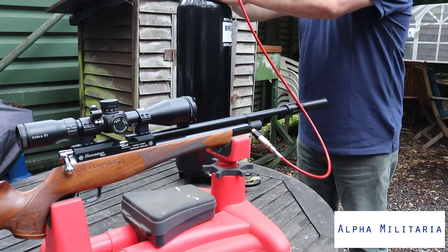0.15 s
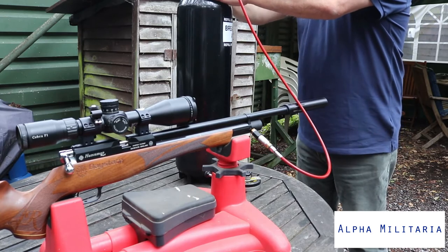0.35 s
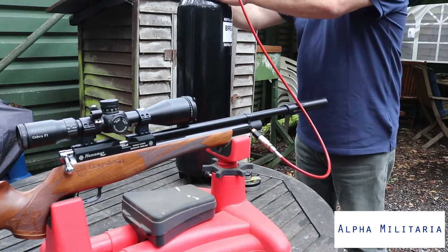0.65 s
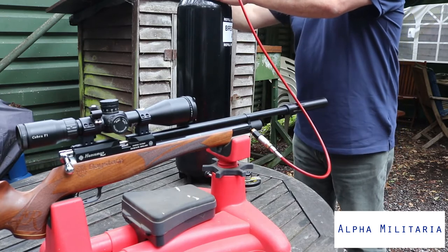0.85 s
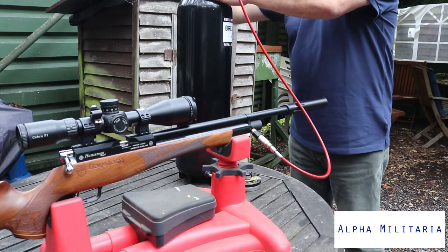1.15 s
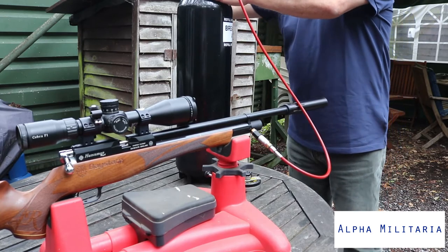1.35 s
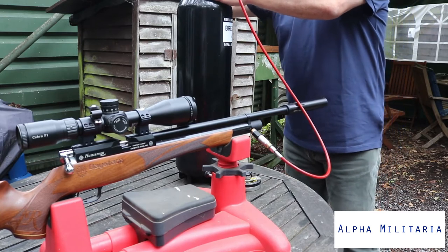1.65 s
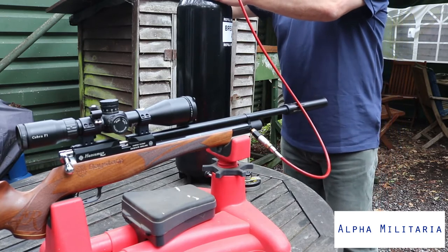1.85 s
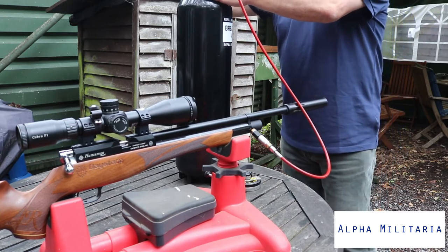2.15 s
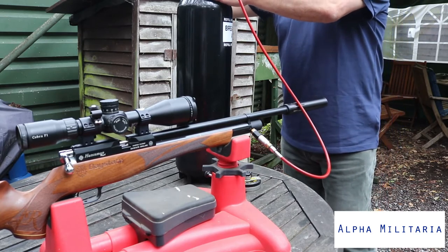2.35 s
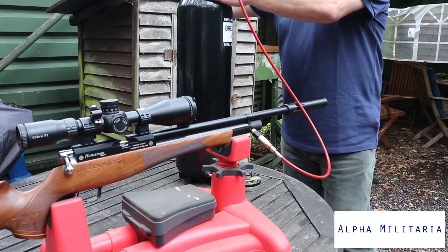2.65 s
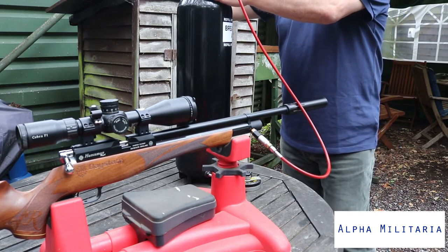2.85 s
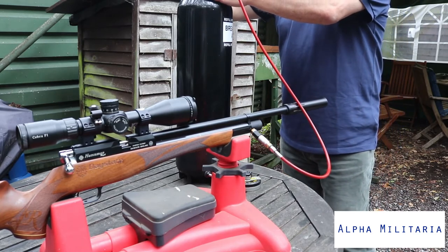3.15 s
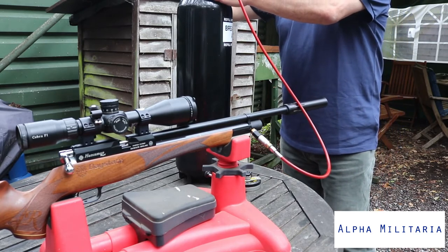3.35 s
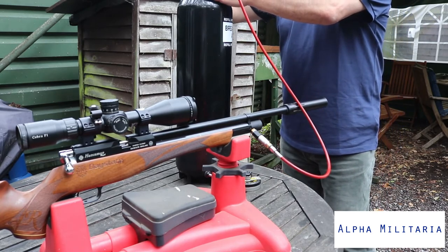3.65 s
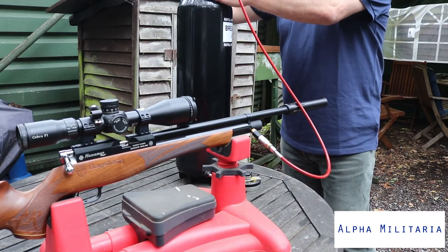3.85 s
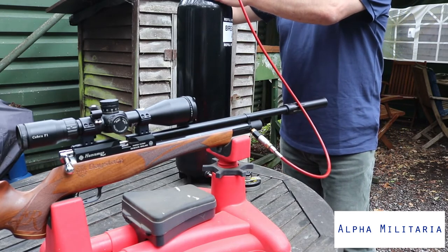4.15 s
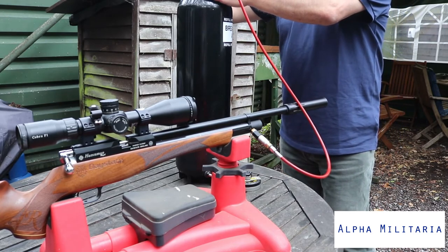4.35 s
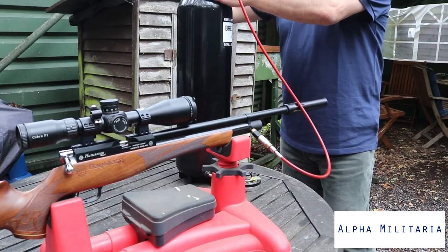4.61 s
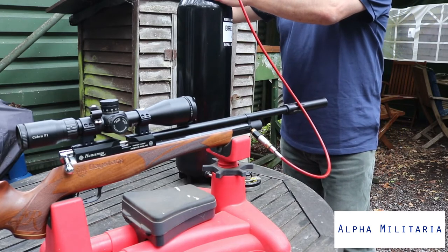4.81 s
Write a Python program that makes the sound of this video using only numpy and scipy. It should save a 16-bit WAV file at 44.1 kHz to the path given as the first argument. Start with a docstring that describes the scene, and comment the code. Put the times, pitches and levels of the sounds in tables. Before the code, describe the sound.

Outdoors in a yard, a seal briefly squeaks and a sharp hiss of compressed air bursts from a nearby cylinder filling an air rifle. The hiss wavers and spits, holds for about two seconds, then thins out. A final spurt is followed by a hollow rush as the hose vents and dies away. Distant traffic and wind rumble dully underneath, dipping while the hiss is loud.

```python
"""In a yard between wooden sheds, compressed air escapes at the valve of a cylinder filling an air rifle.
The seal squeaks, the valve cracks open with a puff, and a bright jet hisses, flutters and spits as it
slowly weakens. After a last spurt it chokes, and a hollow blast empties the hose. An automatic volume
control holds the jet down, and the dull rumble of far traffic and wind with it."""
import sys
import numpy as np
from scipy import signal
from scipy.fft import rfft, irfft
from scipy.io import wavfile

SR = 44100
rng = np.random.default_rng(int(sys.argv[2]) if len(sys.argv) > 2 else 0)


def dump(signal):
    """Clip the signal to [-1, 1] and save it as 16-bit WAV at the path in sys.argv[1]."""
    limited = np.clip(np.atleast_2d(signal).T, -1, 1)
    pcm = np.round(limited * 32767).astype(np.int16)
    wavfile.write(sys.argv[1], SR, pcm)


N = 219461
TIME, FREQS = np.arange(N) / SR, np.maximum(np.fft.rfftfreq(N, 1 / SR), 1)
SIDES = np.array([[1], [-1]])   # left ear, right ear


def from_db(db):
    """Turn decibels into a factor to multiply by."""
    return 10 ** (np.asarray(db) / 20)


def rms_one(x):
    """Scale a signal to an average strength (rms) of 1."""
    return x / np.sqrt(np.mean(x ** 2) + 1e-20)


def in_time(rows):
    """Join a table's rows with lines over time, one curve per column."""
    times, *columns = np.transpose(rows)
    return [np.interp(TIME, times, column) for column in columns]


def over_hz(points):
    """Join a table's rows into a curve over all frequencies."""
    hz, value = np.transpose(points)
    return np.interp(np.log(FREQS), np.log(hz), value)


def drift(rate_hz):
    """Smooth random wandering, up to about rate_hz turns a second."""
    return rms_one(irfft(rfft(rng.standard_normal(N)) / (1 + (FREQS / rate_hz) ** 2), N))


def stereo_noise(likeness):
    """Spectra of white noise for two ears, alike by the given share at each frequency."""
    alike = np.clip(over_hz(likeness), 0, .999)
    shared, opposite = rfft(rng.standard_normal((2, N)))
    return np.sqrt(1 + alike) * shared + np.sqrt(1 - alike) * opposite * SIDES


# Tone of the rumble: pitch_hz, level_db
RUMBLE_TONE = [(20, -20), (38, -7.5), (52, 1.5), (68, -2), (118, -1), (150, -4), (240, -4), (380, -7),
               (620, -5), (980, -1.5), (1300, -11.5), (3000, -22.5), (15000, -38)]
# How alike the ears hear it: pitch_hz, share (0 to 1)
RUMBLE_ALIKE = [(50, 0.89), (125, 0.86), (250, 0.65), (500, 0.76), (1000, 0.19), (4000, 0)]
# Wind stirring the bass: time_s, boost_db
BREEZE = [(0, -2), (1.7, 0), (2.4, 0), (3.0, 1), (3.72, 2), (3.82, 4), (3.94, 2.5), (4.6, 0)]
def rumble(level_db):
    """Far traffic and wind; the bass swells with the breeze."""
    wind_db, = in_time(BREEZE)
    spectrum = stereo_noise(RUMBLE_ALIKE) * from_db(over_hz(RUMBLE_TONE))
    noise = irfft(spectrum, N)
    bass = irfft(spectrum / (1 + (FREQS / 300) ** 4), N)
    return from_db(level_db) * (noise + bass * (from_db(wind_db) - 1)) / np.std(noise)


# Whistles of the seal: start_s, end_s, start_hz, end_hz, level_db
SEAL_WHISTLES = [(-.005, 0.046, 2680, 2680, -45.5), (.044, 0.058, 1940, 2010, -46),
                 (0.058, 0.1, 2035, 2100, -35), (0.066, 0.097, 1015, 1000, -41),
                 (0.091, 0.1, 4900, 4500, -19)]
def squeaks(fade_s, waver):
    """Air whistles through the seal as it lifts."""
    out = np.zeros(N)
    for start, end, start_hz, end_hz, level_db in SEAL_WHISTLES:
        pitch_hz = np.interp(TIME, [start, end], [start_hz, end_hz]) * (1 + waver * drift(150))
        swell = np.clip(np.minimum(TIME - start, end - TIME) / fade_s, 0, 1)
        out += from_db(level_db) * swell * np.sin(2 * np.pi * np.cumsum(pitch_hz) / SR)
    return out


# Tone of the jet: pitch_hz, level_db
JET_TONE = [(150, -57), (500, -27.5), (950, -19.5), (1270, -21), (1600, -15), (1950, -17), (2300, -13),
            (3400, -9.5), (4700, -7), (7200, -3), (8200, 1), (10800, 0), (13000, 0), (14500, -0.3),
            (15700, -1.5)]
# Where the valve outlet rings: pitch_hz, width_hz, level_db
OUTLET_RINGS = [(1450, 130, -4.5), (2280, 440, -4), (2980, 180, -6), (4940, 130, -16), (4990, 180, -8.5),
                (6520, 440, -9.5), (7500, 140, -30), (8240, 170, -16), (8700, 50, -16), (9850, 280, -12)]
# How alike the ears hear escaping air: pitch_hz, share (0 to 1)
AIR_ALIKE = [(800, .42), (1600, .6), (2000, .38), (2350, .62), (2650, .42), (3050, .63), (4300, .47),
             (5000, .73), (5600, .54), (7200, .58), (7700, .76), (8600, .93), (9500, .93), (9900, .82),
             (10700, .98), (16000, .97)]
def hiss_spectrum(tone=JET_TONE, rings=OUTLET_RINGS):
    """Air rushing out makes a broad hiss, stronger at the pitches where the opening rings."""
    peaks = sum(from_db(db) / (1 + (2 * (FREQS - hz) / width) ** 2) for hz, width, db in rings)
    noise = stereo_noise(AIR_ALIKE) * from_db(over_hz(tone)) * (1 + peaks)
    return noise / np.std(irfft(noise.mean(axis=0), N))


def spits(per_s, size, decay_s):
    """Brief random jumps in strength as moisture is blown through the gap."""
    kicks = (rng.random(N) < per_s / SR) * np.minimum(rng.exponential(1, N), 3)
    return 1 + size * signal.lfilter([1], [1, -np.exp(-1 / (decay_s * SR))], kicks + 1e-18)


# Gushes of air: start_s, peak_s, end_s, start_hz, end_hz, width_hz, peak_db
GAP_GUSHES = [(0.073, 0.265, 1.0, 4770, 5050, 900, -25), (0.14, 0.242, 0.31, 3320, 3200, 2080, -16.5),
              (0.075, 0.15, 0.76, 8350, 8300, 600, -23), (0.258, 0.337, 0.5, 1450, 1470, 408, -35.5),
              (0.397, 0.768, 1.07, 11900, 11900, 2230, -18), (0.97, 1.044, 1.21, 8900, 9000, 1700, -15.5),
              (1.02, 1.1, 1.28, 11100, 11400, 2165, -15), (1.03, 1.149, 1.44, 13300, 13500, 2280, -15.5),
              (1.213, 1.34, 1.6, 8800, 8800, 1500, -14), (1.423, 1.574, 1.76, 14200, 14200, 2400, -15.5),
              (1.595, 1.648, 1.72, 8650, 8750, 1250, -13.5), (1.662, 1.702, 1.84, 13800, 14400, 2600, -13),
              (1.77, 1.87, 2.03, 10500, 9600, 1400, -18.5), (1.93, 1.983, 2.25, 13900, 13800, 2600, -18.5),
              (2.027, 2.174, 2.4, 12000, 11700, 1800, -21), (2.098, 2.258, 2.36, 4500, 4970, 3000, -25),
              (2.338, 2.494, 2.61, 1800, 1650, 1500, -36.5), (2.353, 2.53, 2.75, 953, 885, 400, -47.5),
              (2.37, 2.476, 2.72, 8400, 8700, 800, -32), (2.497, 2.656, 2.8, 14200, 14340, 2500, -25),
              (2.72, 2.93, 3.04, 13700, 13300, 2700, -28.5), (3.0, 3.141, 3.3, 12550, 11700, 2000, -28.5),
              (3.01, 3.143, 3.28, 6760, 6500, 4700, -28.5), (3.02, 3.313, 3.52, 9100, 8350, 1500, -30),
              (3.447, 3.515, 3.65, 4200, 4150, 1660, -38.5), (3.753, 3.81, 3.85, 4250, 4200, 3170, -31),
              (3.698, 3.79, 3.87, 11700, 11700, 2570, -29), (3.9, 3.988, 4.2, 2300, 2370, 600, -39),
              (3.96, 4.035, 4.12, 14500, 14500, 2400, -28)]
def gushes(flicker_db):
    """As the hand turns the valve, the gap rings in bands of hiss that flare, glide and die down."""
    out = np.zeros((2, N))
    noise = irfft(hiss_spectrum(), N) * from_db(flicker_db * drift(22))
    for start, peak, end, start_hz, end_hz, width_hz, peak_db in GAP_GUSHES:
        span = (TIME > start) & (TIME < end)
        air = np.roll(noise, rng.integers(N), axis=1)[:, span]
        pitch_hz = np.interp(TIME[span], [start, end], [start_hz, end_hz])
        glide = np.exp(2j * np.pi * np.cumsum(pitch_hz) / SR)
        # Slide the pitch down to 0 Hz, keep what is near it, slide it back up.
        lowpass = signal.butter(2, width_hz / 2, fs=SR, output="sos")
        band = np.real(glide * signal.sosfilt(lowpass, air / glide))
        swell = np.sqrt(np.interp(TIME[span], [start, peak, end], [0, 1, 0]))
        out[:, span] += from_db(peak_db) * swell * rms_one(band)
    return out * spits(per_s=26, size=.18, decay_s=0.00065)


# The valve cracks open: start_s, level_db, decay_s, lowest_hz, highest_hz
VALVE_PUFFS = [(0.077, -14, 0.018, 1370, 8900), (3.911, -29, 0.012, 2000, 12000.0)]
def puffs(rise_s):
    """Each time the valve opens, a short puff of air bursts out."""
    out, noise = 0, rms_one(irfft(stereo_noise(AIR_ALIKE), N))
    for start, level_db, decay_s, low_hz, high_hz in VALVE_PUFFS:
        age = np.maximum(TIME - start, 0)
        burst = noise * np.minimum(age / rise_s, 1) * np.exp(-age / decay_s)
        bandpass = signal.butter(4, [low_hz, high_hz], "band", fs=SR, output="sos")
        out = out + from_db(level_db) * signal.sosfilt(bandpass, burst + 1e-18)
    return out


# Air flow as the hand works the valve: time_s, level_db
VALVE_FLOW = [(0.087, -14), (0.151, -9.5), (0.239, -9), (0.366, -8.5), (0.41, -11), (0.501, -12),
              (0.75, -11), (0.883, -9.5), (0.951, -13.5), (1.068, -12), (1.174, -11.5), (1.251, -11.5),
              (1.452, -13.5), (1.76, -10.5), (1.83, -15), (1.943, -14), (2.1, -13.5), (2.235, -15),
              (2.358, -17.5), (2.507, -19.5), (2.594, -23.5), (2.735, -23), (2.9, -25.5), (3.018, -26.5),
              (3.147, -25.5), (3.284, -25), (3.43, -25), (3.547, -28.5), (3.706, -27.5), (3.74, -24),
              (3.81, -22), (3.85, -23.5), (3.895, -30), (3.93, -29)]
def jet_strength(opens_s, rise_s, shuts_s, flutter_db):
    """The stream flutters and spits until the valve shuts."""
    flow_db, = in_time(VALVE_FLOW)
    opening = np.clip((TIME - opens_s) / rise_s, 0, 1)
    shut_db = 200 * np.maximum(TIME - shuts_s, 0)
    stream = opening * from_db(flow_db - shut_db + flutter_db * drift(9.6))
    return stream * spits(per_s=42, size=.26, decay_s=0.00082)


# Lows and highs against the hiss as the gap changes: time_s, roar_db, sizzle_db
GAP_TONE = [(0.095, -3, -2.5), (0.366, 1.5, -1), (0.611, 3.5, -2), (0.843, -2, -0.5), (0.993, 1.5, 2),
            (1.167, -2.5, 3.5), (1.308, 0.5, 3.5), (1.55, -2, 0), (1.75, -0.5, 1.5), (1.846, -2, 2.5),
            (2.131, 0.5, 1), (2.349, 3, 0.5), (2.479, 6.5, -1), (2.852, 1.5, 0.5), (3.007, 3.5, 3),
            (3.28, 3, -1.5), (3.433, 4.5, -1.5), (3.571, 2, 3), (3.791, 0.5, -1), (3.88, 5, -2)]
def jet(flicker_db):
    """Swirls of four sizes make roar, rush, hiss and sizzle; the gap's shape sets the mix."""
    roar_db, sizzle_db = in_time(GAP_TONE)
    rush_db, hiss_db = 0.14 * roar_db, 0
    noise = hiss_spectrum()
    below = [0] + [1 / (1 + (FREQS / edge_hz) ** 12) for edge_hz in (2800, 7400, 11000)] + [1]
    air = 0
    for k, level_db in enumerate([roar_db, rush_db, hiss_db, sizzle_db]):
        swirls = irfft(noise * (below[k + 1] - below[k]), N)
        air = air + swirls * from_db(level_db + flicker_db * drift(31))
    return air


# Tone of the blast: pitch_hz, level_db
BLAST_TONE = [(150, -50), (500, -18), (1250, -17), (1550, -7.5), (1950, -9.5), (3500, -8), (4200, -6),
              (5500, -6.5), (7000, -2), (8000, 0), (9000, -0.5), (10500, 1), (11300, -2), (12500, -0.5),
              (13400, -2.5), (15700, -1)]
# Where the hollow vent rings: pitch_hz, width_hz, level_db
VENT_RINGS = [(2310, 220, 5), (2980, 150, -4), (4500, 120, -17), (5100, 250, -0.5), (5780, 200, -3),
              (6530, 300, -3), (7850, 200, -2), (8300, 300, -1.5), (9250, 200, -6), (9600, 280, -2),
              (12400, 250, -7), (13300, 250, -6), (14500, 250, -9), (15150, 300, -3)]
def hose_blast(start_s, rise_s, peak_s, peak_db, fall_db_per_s):
    """The air left in the hose blows out through the vent and fades as the pressure drops."""
    air = irfft(hiss_spectrum(BLAST_TONE, VENT_RINGS), N)
    rise = np.clip((TIME - start_s) / rise_s, 0, 1)
    swell_db = np.interp(TIME, [start_s, peak_s], [-0.5, 0])
    past_peak_s = np.maximum(TIME - peak_s, 0)
    fall_db = fall_db_per_s * (np.hypot(past_peak_s, 0.16) - 0.16)   # eases into the fall
    strength = rise * from_db(peak_db + swell_db - fall_db)
    return air * strength * spits(per_s=28, size=.17, decay_s=0.00046)


def beam(right_lead_db):
    """The shortest sound waves shoot toward the right ear."""
    gains = from_db(-right_lead_db / 2 * SIDES)
    amount = over_hz([(10300, 0), (12500, 0.6), (15500, 1.05)])
    return 1 + amount * (gains / gains.mean(axis=0) - 1)


# Faint echoes off the yard around: delay_s, level_db
NEAR_ECHOES = [(.00815, -28), (.00958, -28), (0.0097, -29)]
def yard_echoes(scatter_db, decay_s, dull_hz):
    """A filter: a few faint echoes, plus a short cloud scattered by boards, fence and furniture."""
    echoes = sum(from_db(db) * np.exp(-2j * np.pi * FREQS * delay_s) for delay_s, db in NEAR_ECHOES)
    cloud = irfft(stereo_noise(AIR_ALIKE), N) * np.sqrt(TIME) * np.exp(-np.minimum(TIME / decay_s, 20))
    scatter = from_db(scatter_db) * rfft(rms_one(cloud)) / np.sqrt(N)
    return 1 + echoes + scatter / np.hypot(1, FREQS / dull_hz)


# How much louder the left ear hears things: pitch_hz, left_minus_right_db
LEFT_LOUDER = [(100, 0.2), (1400, 1.1), (2400, -1.8), (4200, 1.7), (5000, -0.2), (6500, 1.1), (8500, -0.45)]
# How much sooner it hears them: pitch_hz, lead_radians
LEFT_SOONER = [(1200, 0), (2400, 0.6), (5800, 0.52), (6700, 0.059), (7900, 0.02), (11000, 0)]
def lean():
    """A filter: each pitch leans a little to one side, mostly the left."""
    balance = from_db(over_hz(LEFT_LOUDER) / 2 * SIDES)
    return balance * np.exp(.5j * over_hz(LEFT_SOONER) * SIDES)


def scene():
    """The valve's sounds echo in the yard, over the outdoor rumble."""
    valve = jet_strength(opens_s=0.0793, rise_s=0.0048, shuts_s=3.92, flutter_db=0.72)
    valve = valve * jet(flicker_db=0.5)
    valve += hose_blast(start_s=3.896, rise_s=0.027, peak_s=4.048, peak_db=-21.5, fall_db_per_s=32)
    valve += puffs(rise_s=0.0056)
    valve += gushes(flicker_db=1.85)
    valve += squeaks(fade_s=0.0034, waver=0.0084)
    spectrum = rfft(valve) * beam(right_lead_db=9)
    spectrum *= yard_echoes(scatter_db=-10.5, decay_s=0.016, dull_hz=10900)
    spectrum += rfft(rumble(level_db=-44.5))
    return irfft(spectrum * lean(), N)


def smooth(x, lag_s):
    """Follow a signal slowly, evening out quick changes."""
    keep = np.exp(-1 / (lag_s * SR))
    return signal.lfilter([1 - keep], [1, -keep], x)


def volume_control(x, limit_db, cut_share, react_s, recover_db_per_s):
    """Quickly remove a share of the level above the limit, then let the volume creep back."""
    level_db = 10 * np.log10(smooth(x.mean(axis=0) ** 2, react_s) + 1e-12)
    cut_db = cut_share * np.maximum(level_db - limit_db, 0)
    creep_db = recover_db_per_s * TIME
    held_db = np.maximum.accumulate(cut_db + creep_db) - creep_db
    return x * from_db(-smooth(held_db, react_s))


def record(dry):
    """Hold loud sound down, then cut off the highest treble."""
    held = volume_control(dry, limit_db=-19.5, cut_share=0.86, react_s=0.012, recover_db_per_s=28.5)
    cutoff_hz = 15740
    return irfft(rfft(held) / np.sqrt(1 + (FREQS / cutoff_hz) ** 900), N)


dry = scene()
out = record(dry)
dump(out)
```